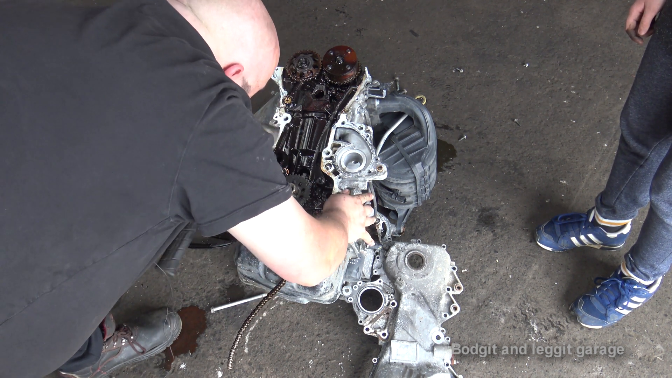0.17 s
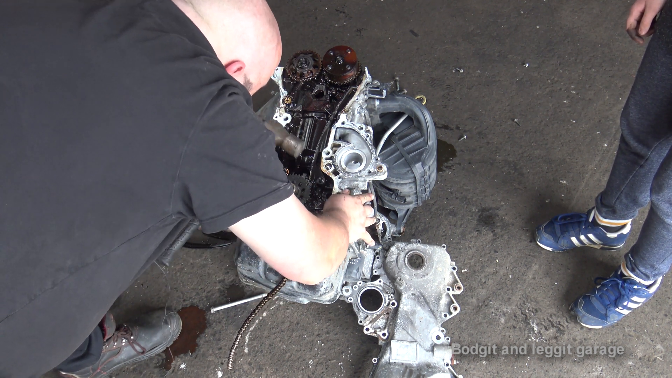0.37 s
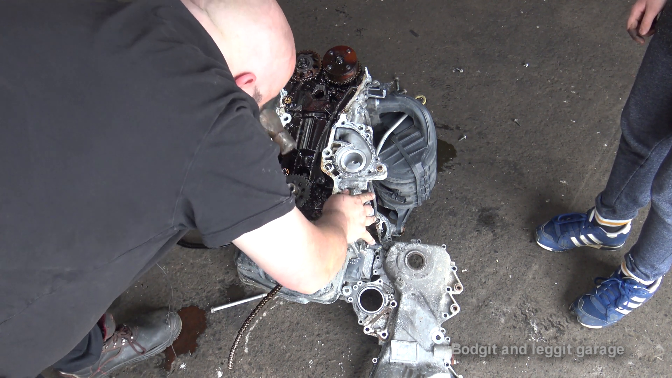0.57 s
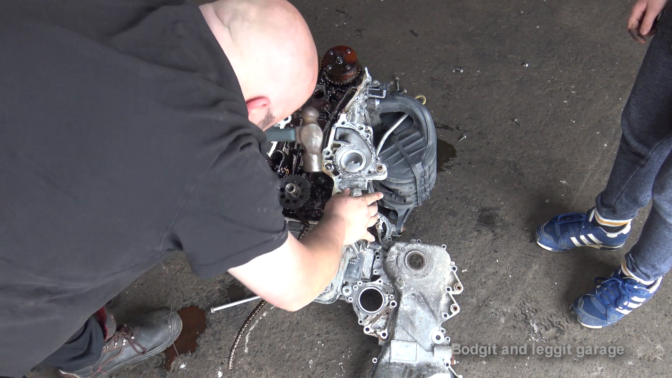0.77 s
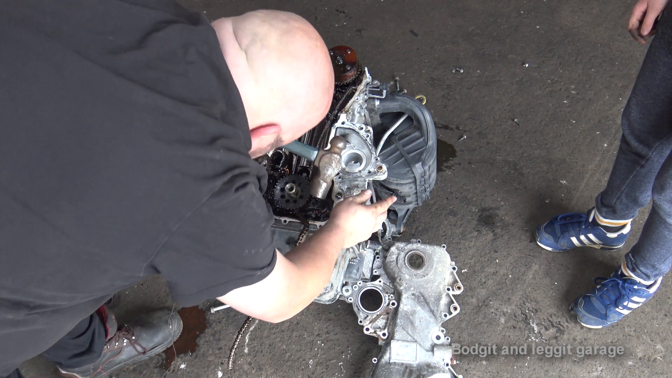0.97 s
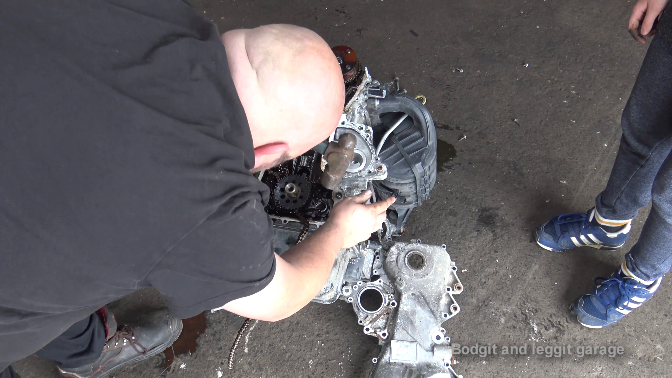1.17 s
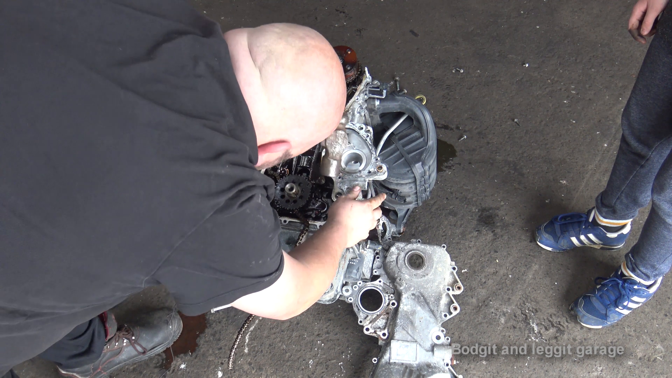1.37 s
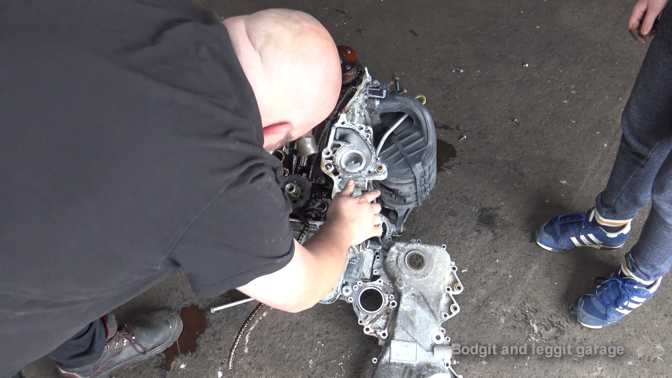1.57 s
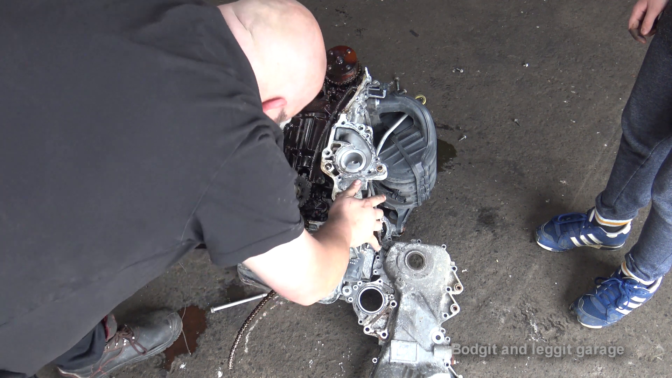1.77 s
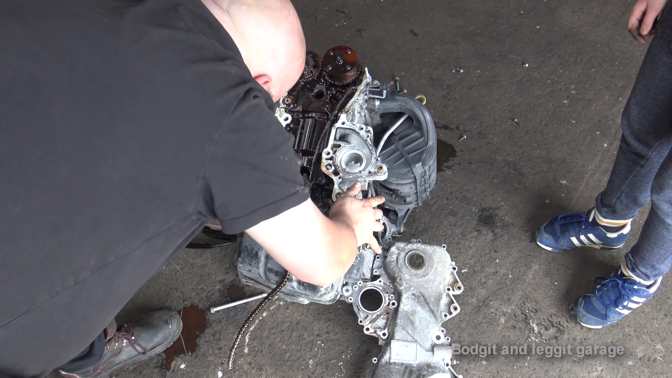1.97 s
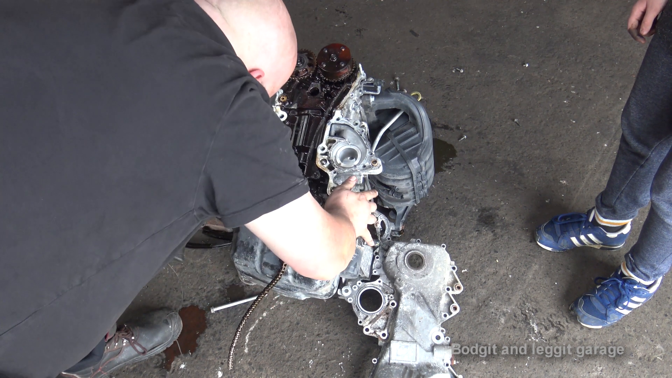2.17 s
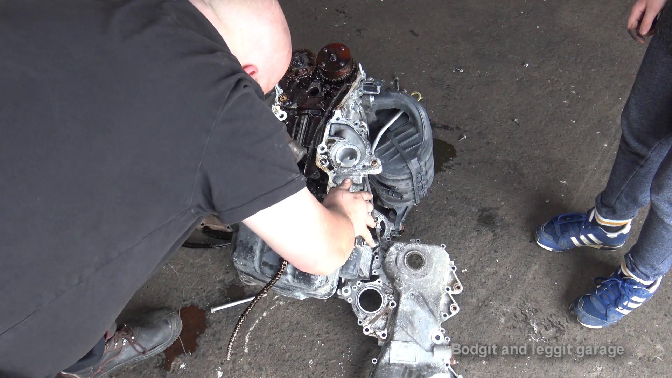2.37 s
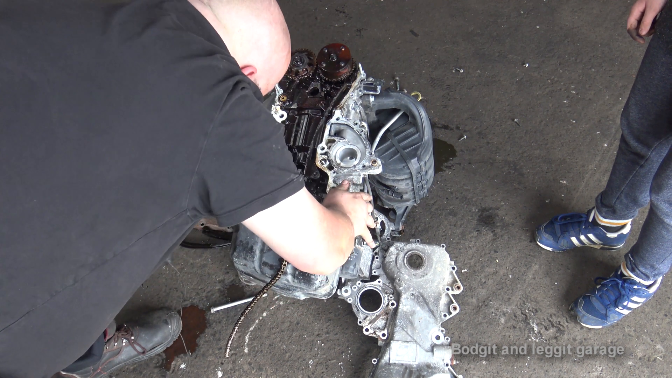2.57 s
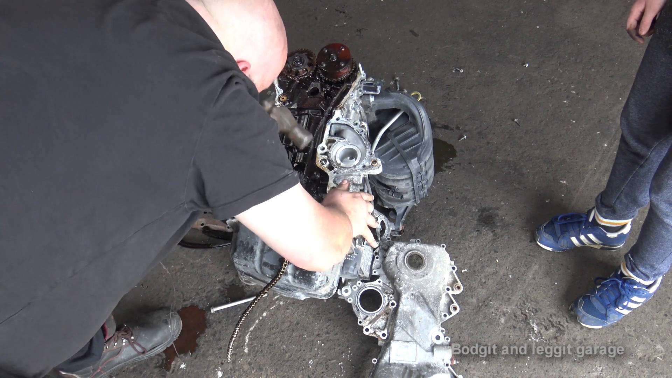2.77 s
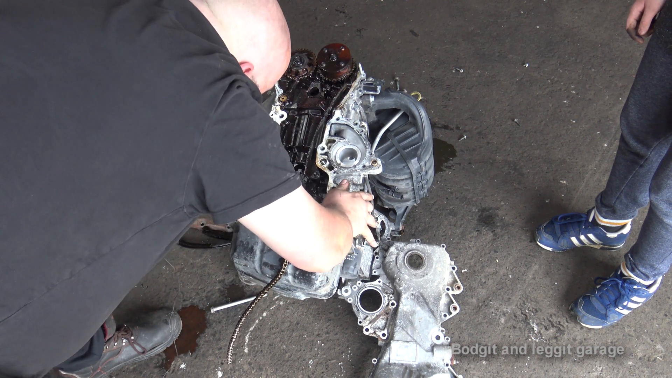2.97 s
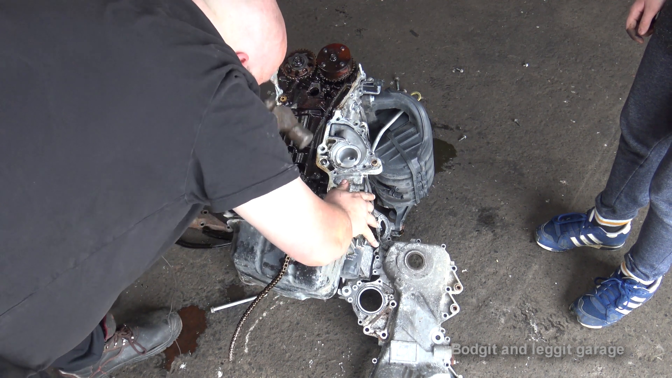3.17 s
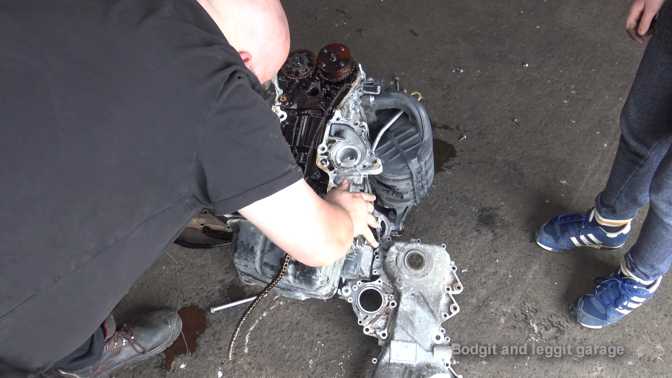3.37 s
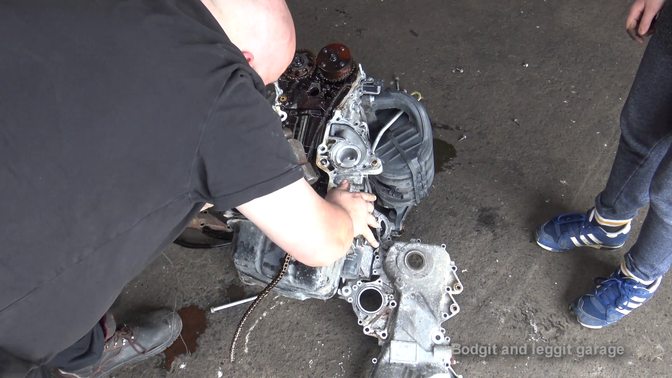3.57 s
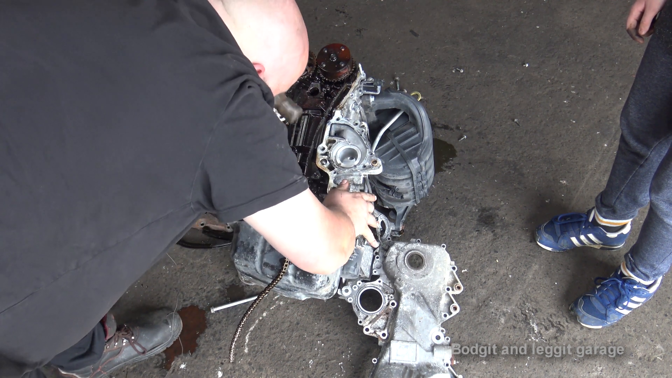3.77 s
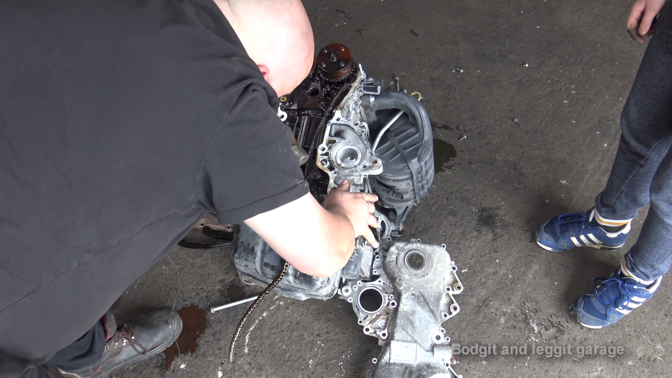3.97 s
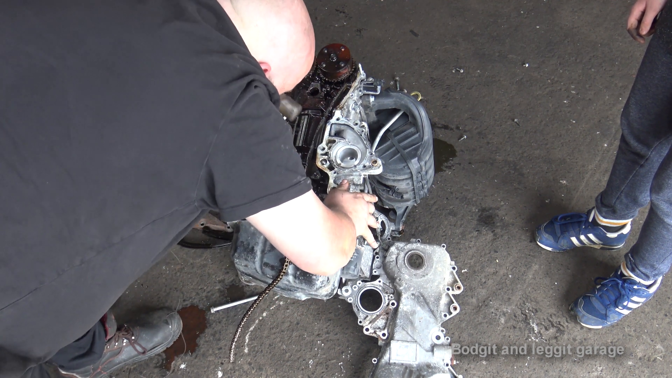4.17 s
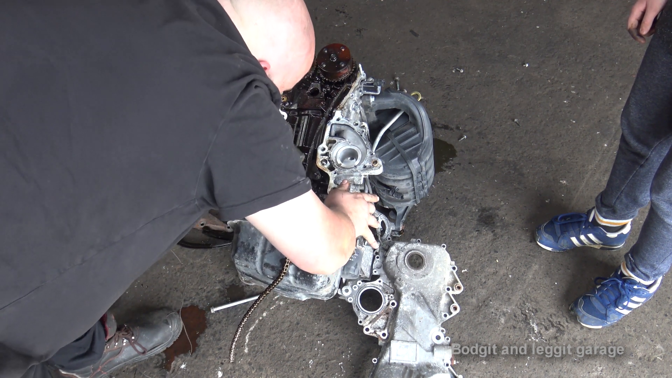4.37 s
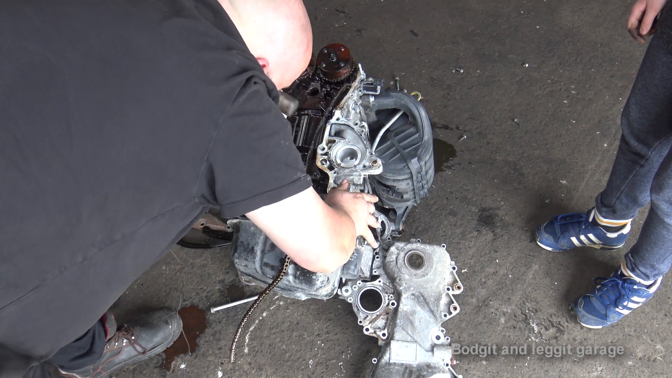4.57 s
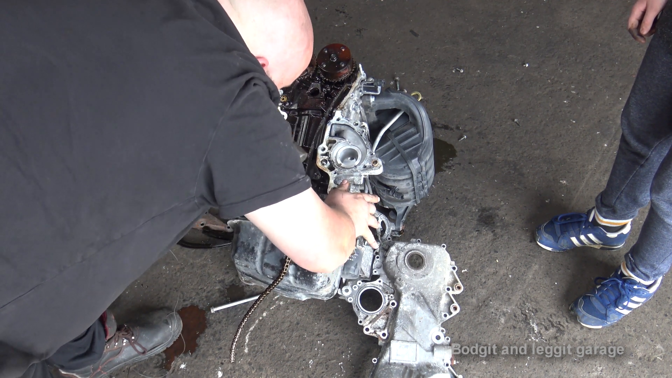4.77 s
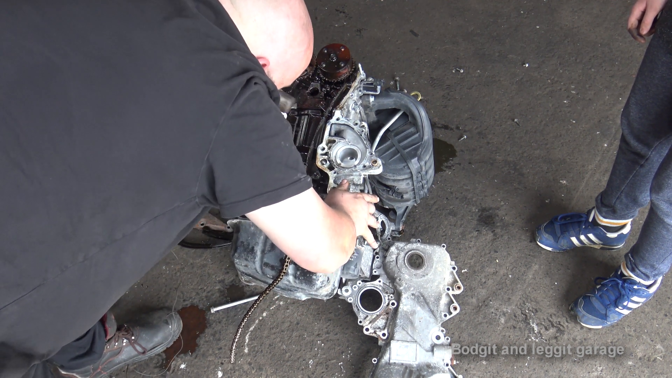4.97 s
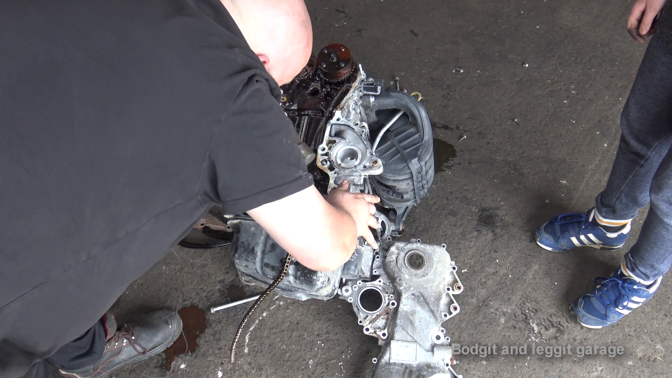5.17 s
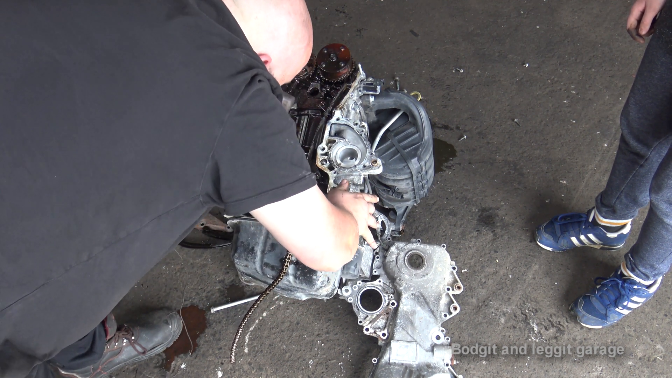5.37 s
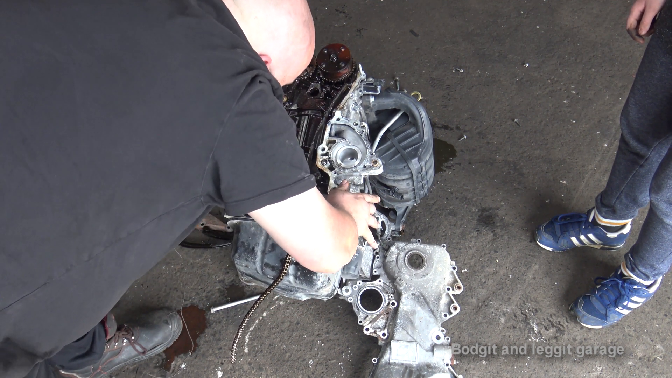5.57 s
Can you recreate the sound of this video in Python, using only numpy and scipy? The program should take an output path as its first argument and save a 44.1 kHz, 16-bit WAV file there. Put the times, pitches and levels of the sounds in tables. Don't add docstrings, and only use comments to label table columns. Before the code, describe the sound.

Sharp, dry metallic knocks in a hard-walled garage, recorded close. After the dying ring of a previous strike and a single blow, there is a quiet gap with clothing movement, a low step and a distant passing car. Hammering resumes, the first blow ringing brighter with loose parts rattling and sliding, then nine more taps follow steadily, varying slightly in tone and force.

```python
import sys
import numpy as np
from scipy import signal
from scipy.io import wavfile
from scipy.ndimage import uniform_filter1d

SR = 44100
rng = np.random.default_rng(int(sys.argv[2]) if len(sys.argv) > 2 else 0)


def dump(signal):
    limited = np.clip(np.atleast_2d(signal).T, -1, 1)
    pcm = np.round(limited * 32767).astype(np.int16)
    wavfile.write(sys.argv[1], SR, pcm)


def invert_db(x):
    u = np.asarray(x, float) / 20
    return 10 ** u


N = 247577

# f/Hz, level/dB, t60/s
CASTING_MODES = [(300, -15, .12), (468, -4, .15), (556, -6, .16), (625, -1, .18), (685, -2, .14),
                 (775, -12, .1), (886, -8, .13), (1000, -8, .26), (1355, -10, .2), (1391, -12, .15),
                 (1540, -16, .13), (1765, -11, .18), (1880, -16, .3), (1975, -15, .22), (2128, -12, .15),
                 (2309, -13, .11), (2410, -8, .09), (2455, -13, .12), (2995, -13, .14), (3195, -10, .19),
                 (3596, -16, .09), (3800, -8, .07), (3945, -11, .09), (4110, -8, .07), (4250, -10, .065),
                 (4438, -10, .07), (4770, -11, .06), (6450, -16, .025), (9700, -22, .035),
                 (11880, -25, .08)]
# f/Hz, density/dB per Hz
CRACK_SPECTRUM = [(59, -43), (100, -4), (589, 11), (1240, -20.5), (2520, 3.5), (3940, -1.5), (5430, -10),
                  (6450, -4.5), (8150, -16), (9470, -8), (12000, -16.5), (15100, -19), (16500, -49.5)]
# f/Hz, density/dB per Hz
ROOM_SPECTRUM = [(90, -32.5), (200, -2), (470, -16.5), (950, -4), (1200, -23.5), (1850, -15), (2900, -23),
                 (4200, -21), (4800, -27), (5300, -38.5), (6500, -32), (7500, -39), (12000, -41),
                 (16500, -55)]
SPOT_SPREAD_DB, PARTNER_GAIN = 3, .6


def evened(x):
    return x / np.sqrt(np.mean(x ** 2) + 1e-20)


def read(points, hz):
    f, value = np.transpose(points)
    return np.interp(np.log(hz + 1), np.log(f + 1), value)


def add(mix, start_s, sound):
    at = round(start_s * SR)
    sound = sound[max(-at, 0):]
    part = mix[max(at, 0):][:len(sound)]
    part += sound[:len(part)]


def hiss(field_db, count):
    hz = np.fft.rfftfreq(256, 1 / SR)[:, None]
    t = np.arange(count // 64 + 5) * 64 / SR
    a, b = rng.standard_normal((len(t), len(hz), 2)).T
    spectra = (a + 1j * b) * invert_db(field_db(hz, t)) / 100
    return 8 * signal.istft(spectra, nperseg=256, noverlap=192)[1][:count]


def click(colour, count):
    hz = abs(np.fft.fftfreq(4096, 1 / SR))
    log_gain = np.log(invert_db(read(CRACK_SPECTRUM, hz) + read(colour, hz)))
    phase = -signal.hilbert(log_gain).imag
    pulse = np.fft.ifft(np.exp(log_gain + 1j * phase)).real[:2048]
    return np.pad(pulse / abs(pulse).max(), (0, count - len(pulse)))


def gritty_contact(colour):
    return lambda hz, s: read(CRACK_SPECTRUM, hz) + read(colour, hz)


def chatter(colour, t):
    grit = evened(hiss(gritty_contact(colour), len(t)))
    contact = grit * invert_db(-3 - 60 * t / 0.009)
    return contact + uniform_filter1d(grit, size=2) * invert_db(-13.0 - 60 * t / 0.045)


def shiver(colour, t):
    # f/Hz, density/dB per Hz
    shiver_spectrum = [(59, -40), (100, 4.5), (368, -18), (602, 11.5), (1030, -9.5), (1220, -23),
                       (1350, -13), (1640, 9), (3050, -31), (5210, -23), (12000, -41.5), (15500, -50.5),
                       (16500, -58)]
    # f/Hz, t60/s
    shiver_t60 = [(200, 0.21), (700, 0.16), (2000, 0.02), (5000, 0.15), (12000, 0.027)]

    def field_db(hz, s):
        return read(shiver_spectrum, hz) + read(colour, hz) - 60 * s / read(shiver_t60, hz)
    return hiss(field_db, len(t))


def ring(modes, t, spread_db, colour, partner_gain):
    hz, db, t60_s = np.transpose(modes)[:, :, None]
    spot, apart, phase = rng.standard_normal((len(modes), 3)).T[:, :, None]
    early = t[:SR // 3]
    twin = partner_gain * np.sin(2 * np.pi * hz * (1 + .012 * apart) * early + phase)
    pair = np.sin(2 * np.pi * hz * early) + twin
    gain = invert_db(db + read(colour, hz) + spread_db * spot - 60 * early / t60_s)
    sound = (gain * pair).sum(0)
    fade_out = np.minimum(20 * early[::-1], 1)
    return np.pad(sound * fade_out, (0, len(t) - len(early)))


def hammer_ring(hammer_db, t):
    # f/Hz, level/dB, t60/s
    hammer_modes = [(5523, -20, .28), (6800, -24, .05), (8470, -31, .48), (9850, -20, .1),
                    (11880, -18, .12), (15730, -24, .04)]
    return invert_db(hammer_db - 21) * ring(hammer_modes, t, 1.0, [(1000, 0.013), (9000, 0.0074)], 0)


def add_echoes(heard, near):
    # delay/s, level/dB
    early_echoes = [
        (.0035, -6.5),
        (.0085, -11),
        (.013, -16.5),
    ]
    for delay_s, db in early_echoes:
        add(heard, delay_s * rng.uniform(.93, 1.2), invert_db(db) * uniform_filter1d(near, size=3))


def add_floor_knocks(heard, dull_db, t):
    # delay/s, level/dB
    floor_knocks = [
        (.0003, -8),
        (.0078, -5.5),
    ]
    knock = invert_db(dull_db + 11 - 60 * t / 0.017) * np.sin(2 * np.pi * 600 * t) * (1 - np.exp(-t / 0.0019))
    for delay_s, db in floor_knocks:
        add(heard, delay_s, invert_db(db) * knock)


def garage(colour, count):
    # f/Hz, t60/s
    room_t60 = [(60, 1), (250, 0.95), (1000, 0.78), (2500, 0.79), (6000, 0.78), (14000, 0.68)]

    def field_db(hz, s):
        return read(ROOM_SPECTRUM, hz) + read(colour, hz) - 60 * s / read(room_t60, hz)
    build_up = np.clip(np.arange(count) / SR / 0.0046 - .3, 0, 1)
    return hiss(field_db, count) * build_up


def room_lines(casting, count):
    # f/Hz, level/dB
    air_loss = [(2200, 0), (3500, -5), (12000, -12)]
    flat = garage([(hz, read(air_loss, hz) - db) for hz, db in ROOM_SPECTRUM], count)
    return signal.fftconvolve(casting, flat / np.linalg.norm(flat))[:count]


def thump(thump_db, t):
    return invert_db(thump_db - 24 - 60 * t / 0.44) * (1 - np.exp(-t / 0.0078)) * np.sin(2 * np.pi * 96 * t)


def blow(peak_db, dull_db, bright_db, hammer_db, *spot_db):
    t = np.arange(2 * SR // 3) / SR
    thump_db = -15.5 - peak_db
    colour = [(150, thump_db), (300, dull_db + 11.5), (550, dull_db + 12.5), (800, dull_db + 10.5),
              (1200, spot_db[0]), (1750, spot_db[1]), (2300, 0.5), (3100, spot_db[2]),
              (4300, 0.003), (5500, spot_db[3]), (7000, bright_db + 13.0)]
    near = (chatter(colour, t) + invert_db(-1.5) * shiver(colour, t)) * np.minimum(t / 0.00064, 1)
    casting = invert_db(-18.5) * ring(CASTING_MODES, t, SPOT_SPREAD_DB, colour, PARTNER_GAIN)
    rings = (casting + hammer_ring(hammer_db, t)) * np.minimum(t / 0.00029, 1)
    heard = invert_db(0.5) * click(colour, len(t)) + near + rings
    add_echoes(heard, near)
    add_floor_knocks(heard, dull_db, t)
    wash = garage(colour, len(t))
    lines = room_lines(casting, len(t))
    direct = (heard + invert_db(-20.5) * lines) / abs(heard).max()
    return invert_db(peak_db) * (direct + thump(thump_db, t) + invert_db(-7) * wash)


def traffic():
    # f/Hz, density/dB per Hz
    street_spectrum = [(12, -49), (20, -23.5), (43, -19), (65, -9), (86, -13), (195, -15.5), (273, -15.5),
                       (332, -16.5), (479, -20), (670, -22.5), (729, -16), (1140, -20.5), (1350, -23),
                       (1470, -26), (16500, -67)]
    hum_hz, pass_hz, width_hz = 62.7, 152, 6.1
    wash_db, hum_db, drone_db, pass_rise_db = -61, -61, -65, 4.5
    pass_s, pass_width_s, hum_start_s, calming_db_per_s = 1.43, 0.33, 0.62, 1.35
    hz = np.fft.rfftfreq(2048, 1 / SR)[:, None]
    frames = N // 512 + 5
    a, b, c, d, patches = rng.standard_normal((frames, len(hz), 5)).T
    patches = evened(uniform_filter1d(uniform_filter1d(patches, 12, 0), 8, 1))
    spectra = [(a + 1j * b) * invert_db(read(street_spectrum, hz) + 1.5 * patches),
               (c + 1j * d) / (1 + ((hz - hum_hz) / width_hz) ** 2),
               (d + 1j * c) / (1 + ((hz - pass_hz) / width_hz) ** 2)]
    wash, hum, drone = (evened(signal.istft(z, nperseg=2048, noverlap=1536)[1][:N]) for z in spectra)
    now = np.arange(N) / SR
    passing = np.exp(-((now - pass_s) / pass_width_s) ** 2)
    wash = wash * invert_db(wash_db + pass_rise_db * passing)
    drone = drone * passing * invert_db(drone_db)
    hum = hum * np.clip(now / hum_start_s, .4, 1) * invert_db(hum_db)
    return (wash + drone + hum) * invert_db(-calming_db_per_s * now)


def rattle(peak_db, bright_db):
    t = np.arange(SR // 3) / SR
    colour = [(900, 0.016), (1500, bright_db), (4500, bright_db), (7000, bright_db - 9.0)]
    scrape = evened(hiss(gritty_contact(colour), len(t))) * invert_db(-60 * t / 0.018)
    short = SR // 9
    damped = ring(CASTING_MODES, t[:short], SPOT_SPREAD_DB, colour, PARTNER_GAIN)
    damped = np.pad(damped, (0, len(t) - short)) * invert_db(-3 - 60 * t / .08)
    knock = (scrape + damped) * np.minimum(t / .0012, 1)
    room = invert_db(1 - 60 * t / .4) * garage(colour, len(t))
    return invert_db(peak_db + 5) * (knock / abs(knock).max() + room)


def stroke(hold_s, fade_s):
    t, rise_s = np.arange(SR) / SR, .07
    rise = np.sin(np.pi / 2 * np.clip(t / rise_s, 0, 1)) ** 2
    return rise * invert_db(-20 * np.clip(t - rise_s - hold_s, 0, 2) / fade_s)


def rustle():
    # f/Hz, density/dB per Hz
    cloth_spectrum = [(880, -28), (1500, 2.5), (2050, -4), (4500, -3), (5470, -10.5), (8420, -16),
                      (15100, -27.5), (16500, -33.5)]
    # start/s, hold/s, 20 dB fade/s, level/dB, brightness/dB per octave
    moves = [
        (0.462, 0.073, 0.28, -63.5, 2.5),
        (1.117, 0.3, 0.2, -70.5, -3),
        (2.399, 0.37, 0.18, -67, 3.5),
        (4.522, 0.044, 1, -78.5, 0),
    ]
    flicker = evened(uniform_filter1d(rng.standard_normal(N), 300))
    out = np.zeros(N)
    for start_s, hold_s, fade_s, db, tilt_db in moves:
        cloth = hiss(lambda hz, s: read(cloth_spectrum, hz) + tilt_db * np.log2(hz / 4000 + 0.038), SR)
        add(out, start_s, invert_db(db) * evened(cloth) * stroke(hold_s, fade_s))
    return out * invert_db(1.2 * flicker)


def small_rings():
    # t/s, level/dB, f/Hz, t60/s, rise/s
    pings = [(.912, -38, 58, .12, .008), (.914, -44, 130, .06, .004), (.916, -46, 230, .05, .003),
             (.918, -50, 330, .04, .002), (1.136, -47, 830, .07, .003), (.5, -61, 2800, .2, .02),
             (2.485, -54, 2800, .08, .004), (2.51, -48, 2790, .2, .015), (2.408, -66, 11200, .03, .001),
             (2.508, -66, 13800, .04, .001), (2.58, -60, 2830, .1, .01), (4.6, -58, 4170, .2, .01),
             (4.64, -58, 4250, .22, .015)]
    t, out = np.arange(SR // 3) / SR, np.zeros(N)
    for start_s, db, hz, t60_s, rise_s in pings:
        waver_s = np.cumsum(evened(uniform_filter1d(rng.standard_normal(len(t)), 200))) * .007 / SR
        gain = invert_db(db - 60 * t / t60_s) * (1 - np.exp(-t / rise_s))
        add(out, start_s, gain * np.sin(2 * np.pi * hz * (t + waver_s)))
    return out


def shoe_squeak():
    start_s, length_s, top_hz, arch_depth, level_db = .868, .057, 10950, .055, -82
    arch = np.sin(np.pi * np.arange(0, 1, 1 / SR / length_s))
    hz = top_hz * (1 - arch_depth * (1 - arch))
    out = np.zeros(N)
    add(out, start_s, invert_db(level_db) * arch * np.sin(2 * np.pi * np.cumsum(hz) / SR))
    return out


def drag():
    # f/Hz, density/dB per Hz
    rub_spectrum = [(100, -6), (300, 4), (680, -1), (1100, -15), (1700, -2), (4200, -26.5), (5500, -24),
                    (16000, -44.5)]
    start_s, hold_s, fade_s, level_db, lumps_db = 2.06, 0.14, 0.076, -52.5, 5
    lumps = evened(uniform_filter1d(uniform_filter1d(rng.standard_normal(SR), 120), 120))
    rub = evened(hiss(lambda hz, s: read(rub_spectrum, hz), SR))
    out = np.zeros(N)
    add(out, start_s, rub * invert_db(level_db + lumps_db * lumps) * stroke(hold_s, fade_s))
    return out


def scene():
    # t/s, peak/dB, dull part/dB, bright part/dB, hammer ring/dB
    blows = [(0.281, -8, -16, -21, 4), (2.009, -11, -11.5, -12.5, 12), (2.348, -9, -13.5, -11, 4.5),
             (2.699, -14.5, -14.5, -12, -1), (3.123, -10.5, -16, -10.5, -3), (3.542, -11, -16.5, -11, -5.5),
             (4.004, -10.5, -20.5, -12, -3.5), (4.406, -12.5, -17, -10.5, -0.5),
             (4.788, -7.5, -23, -15, -1), (5.184, -12, -20.5, -13.5, -7), (5.555, -8, -19, -7, -14)]
    # peak/dB, dull/dB, bright/dB, hammer ring/dB
    earlier_blow = (-4, -14.5, -18.5, 8)
    # until/s, then level/dB of modes near 1.2, 1.8, 3.1, 5.5 kHz
    spots = [(1, -6.5, -0.2, -5.5, -3), (2.2, -2, 5, -1, -0.5), (2.5, -7.5, 0.5, -6.5, -3),
             (3, -7.5, 0, -4, 5), (3.3, 4.5, -2.5, -3, 6.5), (3.8, 9.5, -1, -0.9, 1),
             (4.6, -2, -2, -3.5, 0), (5.4, -6, -1, -2.5, -1), (6, -8.5, 1.5, -1.5, -0.5)]
    # t/s, peak/dB, bright part/dB
    rattles = [(0.354, -37, -5.5), (0.389, -42, 0), (2.059, -40.5, -2.5), (2.075, -33, -12.5),
               (2.099, -39, -8), (2.119, -48, -8), (2.134, -40, 2.5), (2.15, -36.5, 4), (2.169, -36, -20),
               (2.185, -50.5, 5), (2.197, -30.5, -10.5), (2.21, -42.5, -7), (2.228, -39.5, -3.5)]
    earlier_s, blow_delay_s = .085, .0014
    hits = np.zeros(N)
    add(hits, -earlier_s, blow(*earlier_blow, *spots[0][1:]))
    for start_s, *columns in blows:
        spot = next(row for row in spots if start_s < row[0])
        add(hits, start_s + blow_delay_s, blow(*columns, *spot[1:]))
    for start_s, *columns in rattles:
        add(hits, start_s, rattle(*columns))
    return (hits + small_rings() + shoe_squeak() + rustle() + drag() + traffic())[None]


def band_limit(x):
    return signal.sosfilt(signal.butter(12, 16780, fs=SR, output="sos"), x)


def record(dry):
    low_edge_hz, top_edge_hz = 40, 16800
    bass_cut = signal.sosfilt(signal.butter(2, low_edge_hz, "high", fs=SR, output="sos"), dry)
    top_cut = signal.firwin(255, top_edge_hz, window=("kaiser", 9), fs=SR)
    band = signal.oaconvolve(bass_cut, top_cut[None], "same")
    return band_limit(band)


dry = scene()
out = record(dry)
dump(out)
```